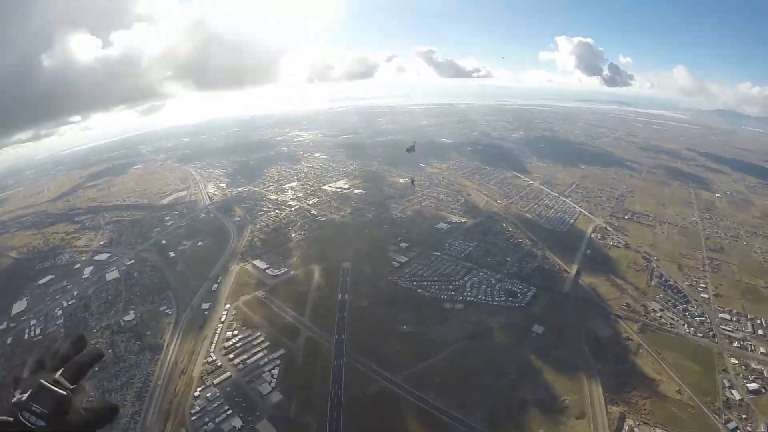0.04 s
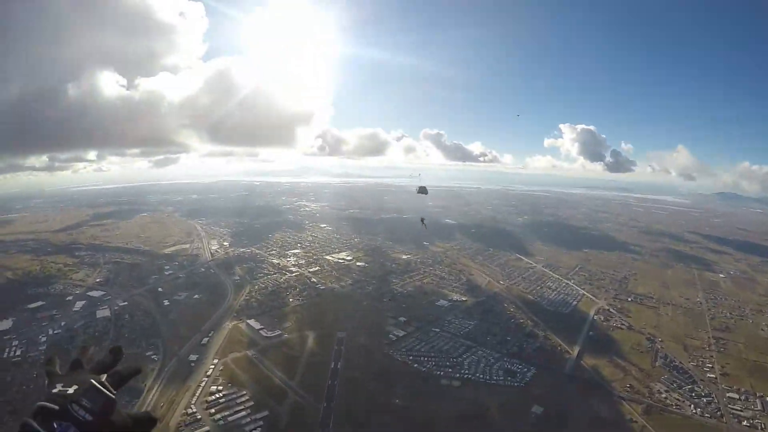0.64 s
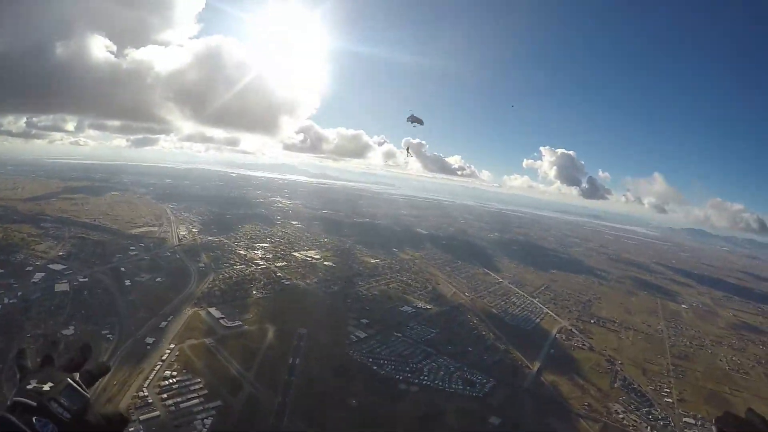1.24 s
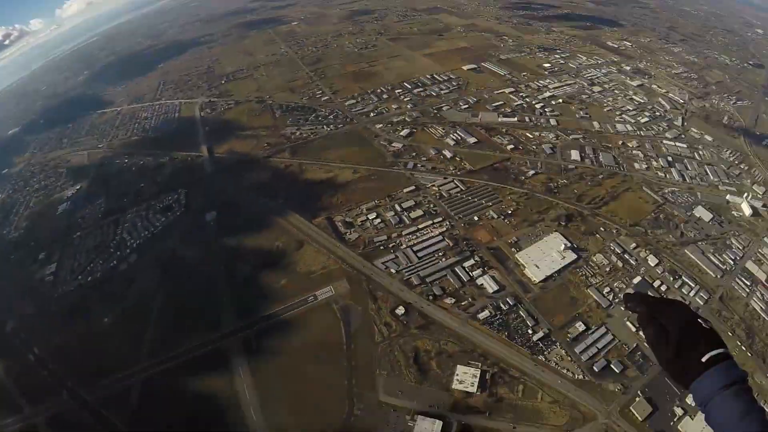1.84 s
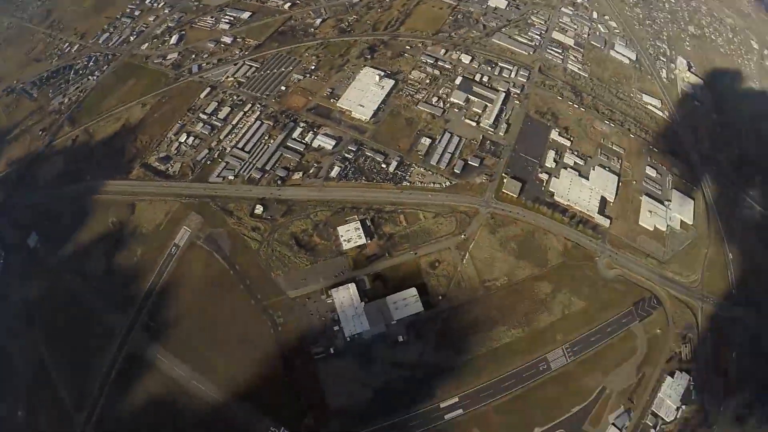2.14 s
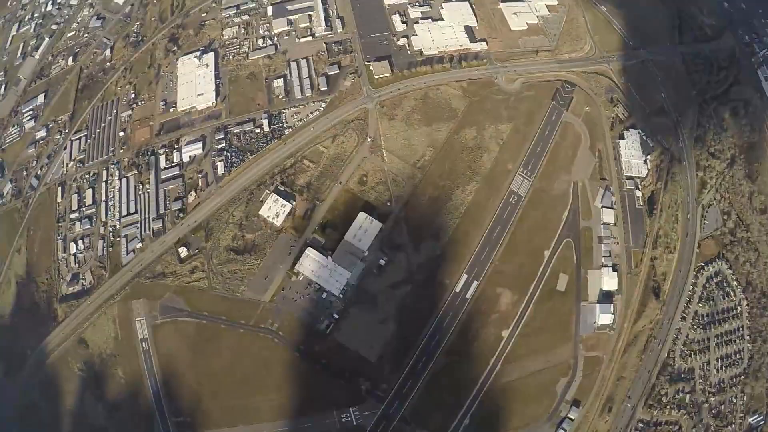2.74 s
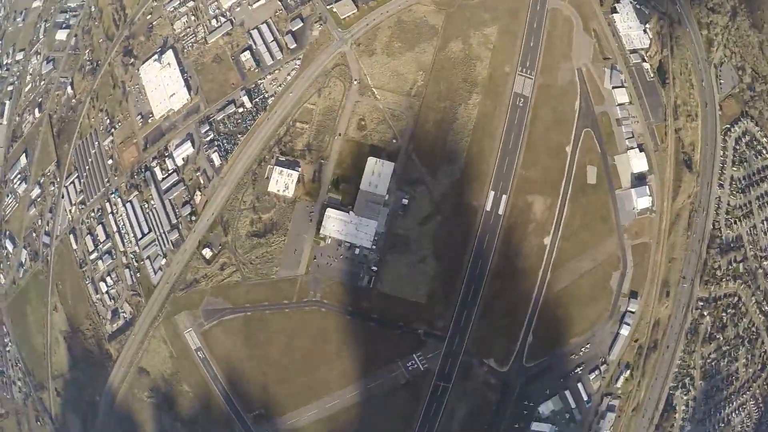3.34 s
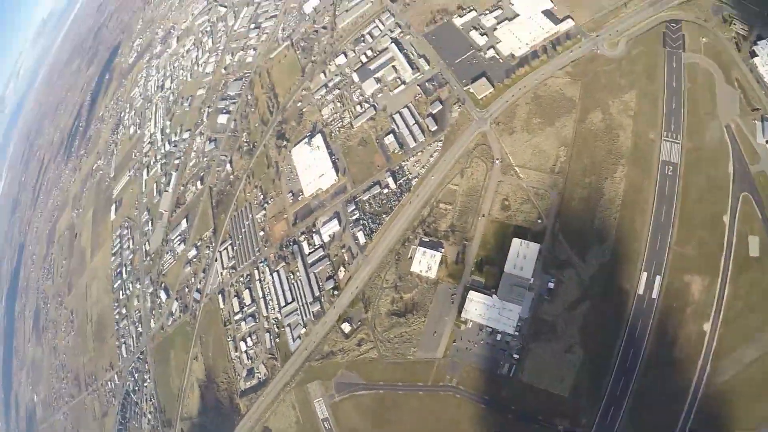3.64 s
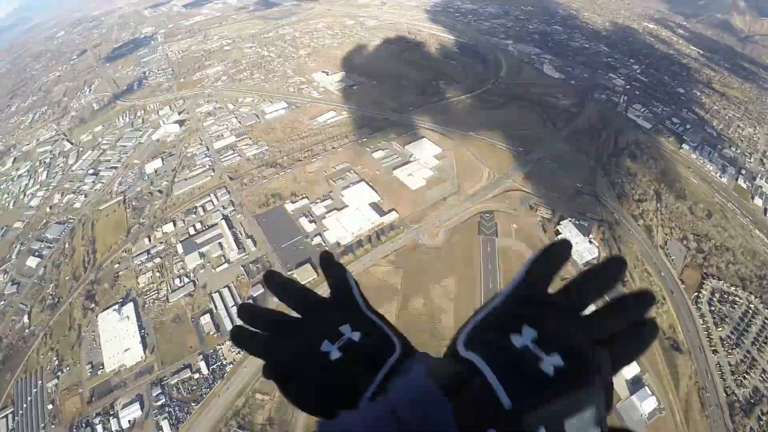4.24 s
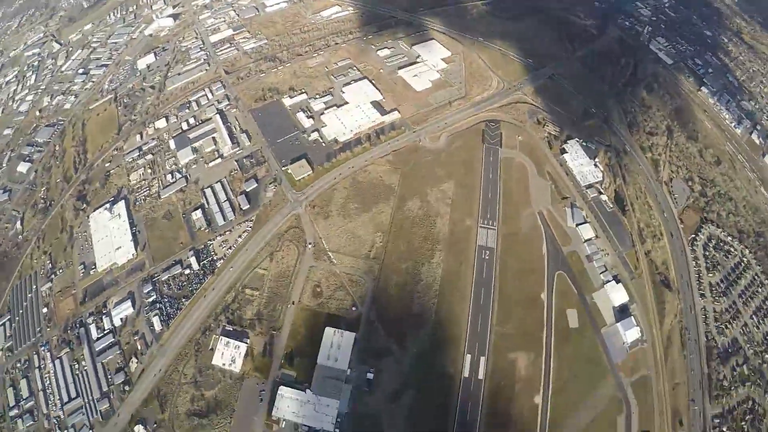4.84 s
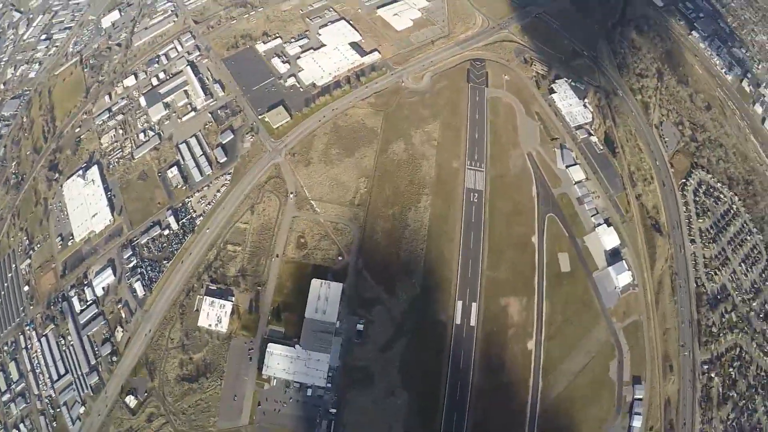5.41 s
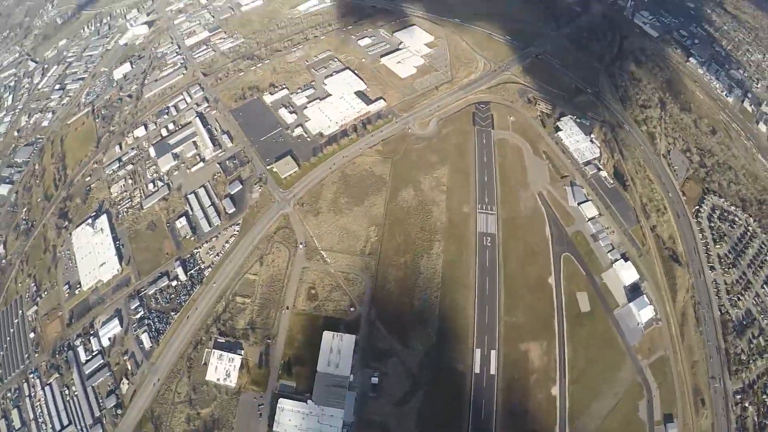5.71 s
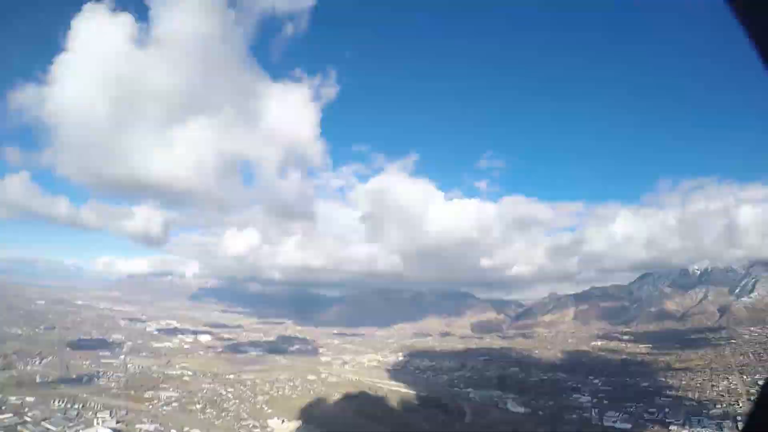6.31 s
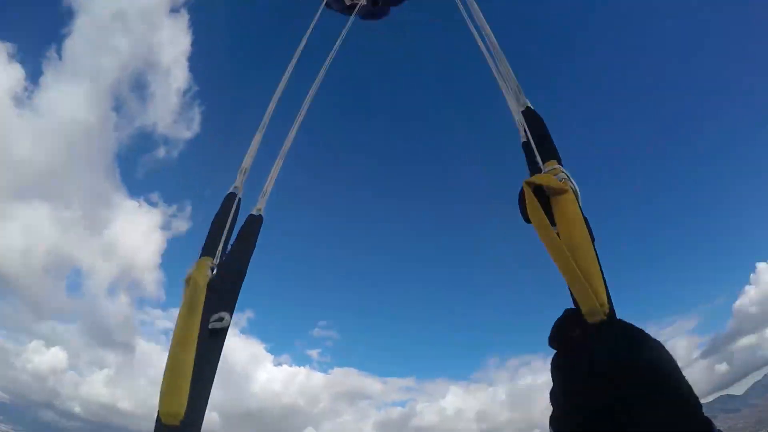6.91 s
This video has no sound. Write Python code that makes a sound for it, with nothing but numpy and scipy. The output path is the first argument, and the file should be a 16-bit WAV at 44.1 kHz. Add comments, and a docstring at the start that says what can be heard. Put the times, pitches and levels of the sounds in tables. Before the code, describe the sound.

Air roars over a helmet microphone during a skydive. At first rapid gusts slap it while clothing flaps and cracks. The wind then smooths into a loud rush that shifts between hollow and bright, with a faint breathy whistle for a while. Near the end a parachute opens with two sharp snaps and the rush falls away to quieter, low buffeting.

```python
"""Skydive from a helmet camera

Air roars over the housing and shakes the microphone. At first eddies slap it some 25 times a second
and cloth flaps and cracks; after a turn the flow is smooth, an edge whistles, and the rush turns hollow
or bright as the head moves. The parachute opens with two sharp snaps; the rush drops to low buffeting."""
import sys
import numpy as np
from scipy import signal
from scipy.fft import rfft, irfft
from scipy.io import wavfile
from scipy.ndimage import uniform_filter1d

SR = 44100
rng = np.random.default_rng(int(sys.argv[2]) if len(sys.argv) > 2 else 0)


def inscribe(sig):
    """Save sig as 16-bit PCM at rate SR to the path in sys.argv[1].

    A 1-D sig is mono; a 2-D sig holds one channel per row.
    Samples are clipped to [-1, 1] before scaling.
    """
    pcm = np.round(np.clip(np.atleast_2d(sig).T, -1, 1) * 32767)
    wavfile.write(sys.argv[1], SR, pcm.astype(np.int16))


N = 307377
T = np.arange(N) / SR
HZ = np.fft.rfftfreq(N, 1 / SR)

# flow angle on the housing: (time [s], angle [0 hollow roar .. 1 bright rush])
FLOW_ANGLE = [(0, 1), (.4, 0.28), (1.67, 0), (1.76, 0.76), (1.9, 0.17), (2.44, 0), (2.52, 0.47),
              (2.85, 0.81), (3.5, 0.36), (3.72, 0.8), (3.95, 0.092), (4.21, 0.21), (4.27, 0.68), (5.05, 1),
              (5.75, 0.1), (6.15, 0.41), (6.32, 1), (6.5, .35)]
# strongest eddies slapping the housing: (time [s], relative level [dB], nominal length [s])
STRONG_GUSTS = [(0.181, -15.5, 0.022), (0.391, -12, .009), (0.421, -14, .012), (0.537, -16.5, .008),
                (0.618, -13.5, 0.017), (0.716, -11, 0.006), (0.753, -10.5, 0.005), (.803, -18.5, .018),
                (0.902, -14, 0.007), (0.942, -20, .008), (1.041, -14.5, 0.015), (1.07, -9, 0.0032),
                (1.103, -13, 0.0038), (1.154, -12, 0.014), (1.239, -13.5, 0.013), (1.322, -14.5, 0.014),
                (1.379, -14.5, 0.0091), (1.415, -9.5, 0.0062), (1.51, -12.5, 0.0066), (1.577, -15, 0.012),
                (1.638, -10, 0.0047), (1.669, -14, .01), (1.716, -18, 0.0059), (1.746, -16, 0.016),
                (4.283, -20.5, 0.012), (4.363, -21, .004), (4.428, -19, .004), (6.534, -24.5, .007),
                (6.872, -28, 0.01), (6.893, -17.5, 0.0055), (6.942, -24.5, 0.011)]
# cloth and lines cracking taut: (time [s], level [dB], end pitch [Hz], rebound delay [s], rebound [ratio])
CLOTH_SNAPS = [(.6438, 1.5, 2130, .0016, .24), (.9440, -8, 2900, 0.0027, 0.55),
               (1.068, -2.5, 2860, .00157, 0.5), (1.4719, 0.5, 2090, .0017, .4),
               (2.261, -3, 1960, .0015, .3), (6.5618, 3, 1830, .00128, 1.1),
               (6.6928, 0.5, 1880, .0016, 0.37), (6.834, -18, 1800, .0015, 0.49)]


def amp(db):
    """Decibels to gain."""
    return 10 ** (np.asarray(db) / 20)


def curves(rows):
    """Each value column of (time, ...) rows at every sample."""
    times, *columns = np.transpose(rows)
    return [np.interp(T, times, column) for column in columns]


def spells(rows, attack_s, release_s):
    """Joint gain of (start, length, level) events that rise, hold and die away."""
    power = np.zeros(N)
    for start, length, db in rows:
        rise = np.clip((T - start) / attack_s, 0, 1)
        fall = np.exp(-np.maximum(T - start - length, 0) / release_s)
        power += (amp(db) * rise * fall) ** 2
    return np.sqrt(power)


def colour(points):
    """Gain at every frequency from (frequency, level) points."""
    hz, db = np.transpose(points)
    return amp(np.interp(np.log(HZ + 1), np.log(hz + 1), db))


def noise(spectrum):
    """Shaped noise, rms 1."""
    x = irfft(rfft(rng.standard_normal(N)) * spectrum, N)
    return x / np.sqrt(np.mean(x ** 2) + 1e-20)


def wander(lo_hz, hi_hz):
    """Random motion between two rates, rms 1."""
    return noise(HZ / np.hypot(HZ, lo_hz) / np.sqrt(1 + (HZ / hi_hz) ** 4))


def resonant(hz, half_width_hz):
    """Noise ringing in one cavity, rms 1."""
    return noise(1 / (1 + ((HZ - hz) / half_width_hz) ** 2))


def steadied(x, window_s):
    """Evens out swells slower than the window."""
    size = max(int(window_s * SR), 2)
    power = uniform_filter1d(uniform_filter1d(x ** 2, size), size)
    return x / np.sqrt(np.abs(power) + 1e-9)


def housing():
    """Airstream spectrum with the housing's cavity resonances."""
    # airstream spectrum: (frequency [Hz], level [dB])
    air = [(150, -6), (300, -12.5), (520, -15), (800, -15), (1080, -6), (1400, -6), (2100, -2.5),
           (3700, 0.5), (4350, -13), (6000, -22), (8500, -28), (11500, -34), (14600, -37.5), (15400, -41)]
    # resonances: (frequency [Hz], width [Hz], gain [dB])
    cavities = [(650, 76, 7), (1880, 190, -3.5), (2480, 330, 5), (2640, 81, -1.5), (3083, 460, 4),
                (4930, 170, 2.5), (5320, 190, 4.5), (5270, 230, 0), (6680, 710, 6), (7800, 250, 4.5),
                (10030, 1060, 7), (12700, 520, 5)]
    cavity_db = sum(db * np.exp2(-(2 * (HZ - hz) / width) ** 2) for hz, width, db in cavities)
    return colour(air) * amp(cavity_db)


def airstream(gains, crossovers_hz=(2150, 4600, 8600)):
    """Turbulent noise in the housing, one gain per band: roar, rush, hiss, fizz."""
    lowpasses = [1 / (1 + (HZ / hz) ** 16) for hz in crossovers_hz]
    shares = np.diff([np.zeros_like(HZ), *lowpasses, np.ones_like(HZ)], axis=0)
    spectrum = housing()
    return sum(gain * noise(spectrum * np.sqrt(share)) for gain, share in zip(gains, np.abs(shares)))


def band_levels_db(force_db, turbulence, angle):
    """All four bands follow the force; the angle trades roar for rush; broken flow is duller."""
    # flow catching the housing squarely: (start [s], length [s], level re force [dB])
    surges = [(1.73, .05, 1), (2.49, 0.48, -0.5), (3.62, 0.047, -10), (4.245, 0.038, 2), (4.47, 0.023, 5),
              (4.78, .33, -4), (6.26, 0.046, -6)]
    # fine fizz riding on the rush: (start [s], length [s], level re force [dB])
    fizzes = [(2.43, 1.46, -17.5), (4.64, 0.94, -18.5)]
    rush = np.hypot(amp(-3 + 6 * angle), spells(surges, attack_s=0.011, release_s=0.019))
    fizz = np.hypot(amp(-21 - 1.5 * turbulence), spells(fizzes, attack_s=0.046, release_s=0.051))
    roar_db = force_db - 1 - 7 * angle
    hiss_db = force_db - 10 - 2 * angle - 1.5 * turbulence
    return roar_db, force_db + 20 * np.log10(rush), hiss_db, force_db + 20 * np.log10(fizz)


def wind(force_db, turbulence, gust_power, calm, gust_bands_db=(-4, -3, -15.5, -25)):
    """Air over the housing flutters; broken flow sinks into lulls and returns in bright bursts."""
    angle, = curves(FLOW_ANGLE)
    roar_db, rush_db, hiss_db, fizz_db = band_levels_db(force_db, turbulence, angle)
    flutter_db = (0.57 + 4.5 * turbulence) * np.tanh(wander(2.8, 94)) + 0.6 * wander(2.6, 12)
    flow = amp(flutter_db - 6 * turbulence * calm)
    dull_db = -2 * turbulence ** 2
    bands_db = (roar_db - 1, rush_db, hiss_db + dull_db, fizz_db + dull_db)
    gains = [np.sqrt((amp(db) * flow) ** 2 + gust_power * amp(gust_db) ** 2)
             for db, gust_db in zip(bands_db, gust_bands_db)]
    # smooth flow sings in the small cavities
    hollow = amp(roar_db - 1) * resonant(1800, 270)
    shrill = amp(rush_db - 7) * angle * resonant(3390, 200)
    singing = (hollow + shrill) * (1 - turbulence) * flow
    # broken flow hoots in a larger one and lands with a dull thud
    hoot = amp(roar_db - 13) * turbulence * resonant(635, 24)
    thud_power = amp(-17) ** 2 * gust_power + (amp(roar_db - 12) * turbulence * flow) ** 2
    grain = steadied(amp(wander(150, 630)), 0.026)
    return (airstream(gains) + singing) * grain + hoot + np.sqrt(thud_power) * resonant(690, 510)


def rumble(turbulence, gust_power):
    """Eddies push on the diaphragm; small ones grow more slowly and crowd into the gusts, which boom."""
    # pressure swings on the microphone: (time [s], level [dB])
    shake = [(0, -14), (1.1, -12), (1.65, -13), (2, -24.5), (2.7, -36), (3.8, -30.5), (4.3, -24.5),
             (5.4, -31.5), (5.9, -23), (6.97, -33.5)]
    # swells of buffeting: (time [s], length [s], large eddies [dB], small eddies [dB])
    buffets = [(2.154, 0.15, -21.5, -34), (2.466, 0.065, -22, -31), (2.954, 0.29, -29, -30),
               (4.155, 0.13, -19, -28), (4.386, 0.1, -23, -14.5), (4.86, 0.079, -21.5, -44),
               (6.009, 0.033, -11, -36), (6.083, 0.035, -12.5, -35), (6.2, 0.047, -15, -40),
               (6.386, 0.12, -18, -20.5), (6.575, 0.075, -11, -25), (6.793, 0.094, -14, -32),
               (6.947, .08, -13.5, -25)]
    # eddy pressure spectra: (frequency [Hz], relative level [dB])
    large_spectrum = [(4, -33), (15, -26), (25, 3), (36, 3.5), (46, 2.5), (62, -8), (110, -21), (400, -76)]
    small_spectrum = [(25, -32), (45, -42), (65, -1.5), (105, -2), (150, -6.5), (220, -12), (330, -18),
                      (520, -25.5), (1500, -29.5), (6000, -82)]
    shake_db, = curves(shake)
    large_power = amp(shake_db - 2 * turbulence + wander(1.6, 6.4)) ** 2
    small_power = amp(0.7 * shake_db - 10 - 3 * turbulence) ** 2 + amp(-11) ** 2 * gust_power
    for time, length, large_db, small_db in buffets:
        swell = np.exp2(-(2 * (T - time) / length) ** 2)
        large_power += amp(large_db) ** 2 * swell
        small_power += amp(small_db) ** 2 * swell
    large = np.sqrt(large_power) * steadied(noise(colour(large_spectrum)), 0.11)
    small = np.sqrt(small_power) * steadied(noise(colour(small_spectrum)), 0.09)
    boom = amp(-7) * np.sqrt(gust_power) * resonant(87.5, 19)
    return large + small + boom


def shed_eddies(force_db, turbulence, rate_hz=25, min_turbulence=0.17, clearance_s=0.03):
    """Broken flow sheds weaker gusts between strong gusts and snaps; rows like STRONG_GUSTS."""
    taken_s = np.array([row[0] for row in STRONG_GUSTS + CLOTH_SNAPS])
    rows = []
    for k, (jitter, strength) in enumerate(rng.standard_normal((220, 2))):
        time = (k + 1 + 0.283 * jitter) / rate_hz
        at = int(time * SR)
        if 0 <= at < N and turbulence[at] > min_turbulence and np.abs(taken_s - time).min() > clearance_s:
            rows.append((time, force_db[at] + 3 + 2 * strength, 0.0081))
    return rows


def gusts(rows, calm_lead_s=0.009, calm_half_width_s=0.0029):
    """Power of gusts that hit fast and trail off, and the calm just ahead of each."""
    power, calm = np.zeros(N), np.zeros(N)
    for time, db, length in rows:
        near = slice(max(int((time - 0.1) * SR), 0), int((time + 0.1) * SR))
        t = T[near] - time
        halvings = np.where(t < 0, (t / (0.55 * length)) ** 4, (t / (0.71 * length)) ** 2)
        power[near] += amp(db - 1) ** 2 * np.exp2(-halvings)
        calm[near] += np.exp2(-((t + calm_lead_s) / calm_half_width_s) ** 2)
    return power, calm


def thumps(push_db=2, lag_s=0.0038, half_length_s=0.0056):
    """Each strong gust ends in a push of pressure with suction on either side."""
    out = np.zeros(N)
    for time, db, _ in STRONG_GUSTS:
        u = (T - time - lag_s) / half_length_s
        out += amp(db + push_db) * (1 - u ** 2) * np.exp(-u ** 2 / 2)
    return out


def crack(t, end_hz, rise_s):
    """A whip of cloth: a few cycles of falling pitch."""
    u = t / rise_s
    cycles = end_hz * rise_s * (u + 0.48 * (1 - np.exp(-u)))
    return u ** 2 * np.exp(2 * (1 - u)) * np.sin(2 * np.pi * cycles)


def flapping(force_db, turbulence, max_rate_hz=40, rise_s=0.00083):
    """Sleeves flap in broken flow: many small cracks of mixed pitch."""
    pitches_hz = np.geomspace(1000, 3000, num=12)
    sizes = rng.uniform(0.37, 1, N) * amp(force_db + 8)
    hits = sizes * (rng.random(N) < turbulence ** 2 * max_rate_hz / SR)
    pitch_index = rng.integers(0, len(pitches_hz), N)
    return sum(signal.oaconvolve(hits * (pitch_index == k), crack(T[:512], hz, rise_s))[:N]
               for k, hz in enumerate(pitches_hz))


def snaps(rise_s=0.00038, ring_db=-17, ring_t60_s=0.022, highpass_hz=1100):
    """Cloth and lines pull taut: a crack, its rebound and a brief ring of the housing."""
    out, ring = np.zeros(N), noise(housing())
    for time, db, hz, delay, rebound in CLOTH_SNAPS:
        near = slice(int(time * SR), int((time + 0.05) * SR))
        for start, size in ((time, 1), (time + delay, rebound)):
            t = np.maximum(T[near] - start, 0)
            tail = amp(ring_db - 60 * t / ring_t60_s) * np.minimum(t / rise_s, 1) * ring[near]
            out[near] += amp(db) * size * (crack(t, hz, rise_s) + tail)
    return signal.sosfilt(signal.butter(3, highpass_hz, "highpass", fs=SR, output="sos"), out)


def whistle(pitch_hz=635, breath_hz=734, sizzle_hz=7340):
    """Breathy edge tone at a cavity's pitch while the face points down, with a thin sizzle above."""
    # edge tone catching and letting go: (start [s], length [s], level [dB])
    catches = [(1.936, .45, -31.5), (2.115, 0.18, -28.5), (2.78, 0.13, -35.5), (3.067, 0.26, -34),
               (3.246, 0.39, -30.5), (3.752, 0.21, -34), (3.97, 0.046, -25)]
    tone = steadied(resonant(pitch_hz, 13), 0.035) + amp(-10) * resonant(breath_hz, 31)
    gate = spells([(start, length, 0) for start, length, _ in catches], attack_s=0.1, release_s=0.25)
    sizzle = amp(-39) * np.minimum(gate, 1) * resonant(sizzle_hz, 350)
    return spells(catches, attack_s=0.014, release_s=0.019) * tone + sizzle


def scene():
    """Air and cloth at the one microphone."""
    # force of the airstream on the housing: (time [s], level [dB])
    force = [(0, -19), (.4, -22), (1.38, -23), (1.46, -28), (1.72, -21.5), (3.2, -18.5), (3.6, -18),
             (3.92, -21), (4.02, -18), (4.28, -18), (4.56, -21.5), (5.5, -19), (5.7, -19.5), (6.3, -18),
             (6.45, -29.5), (6.49, -35.5), (6.75, -36), (6.97, -34)]
    # break-up of the flow into gusts: (time [s], turbulence [0..1])
    breakup = [(0, 0.06), (.36, 0.95), (1.66, 1), (1.8, 0.17), (2, 0.16), (4.15, 0), (4.42, 0.4), (4.65, 0),
               (6.2, 0), (6.52, 0.57), (6.97, 0.6)]
    force_db, = curves(force)
    turbulence, = curves(breakup)
    gust_power, calm = gusts(STRONG_GUSTS + shed_eddies(force_db, turbulence))
    air = wind(force_db, turbulence, gust_power, calm) + rumble(turbulence, gust_power) + thumps()
    return (air + flapping(force_db, turbulence) + snaps() + whistle())[None]


def record(dry, cutoff_hz=15780):
    """Soft clip at full scale, then low-pass."""
    clipped = dry / (1 + dry ** 8) ** (1 / 8)
    lowpass = signal.firwin(801, cutoff_hz, window=("kaiser", 9), fs=SR)
    return signal.oaconvolve(clipped, lowpass[None], "same")


dry = scene()
out = record(dry)
inscribe(out)
```